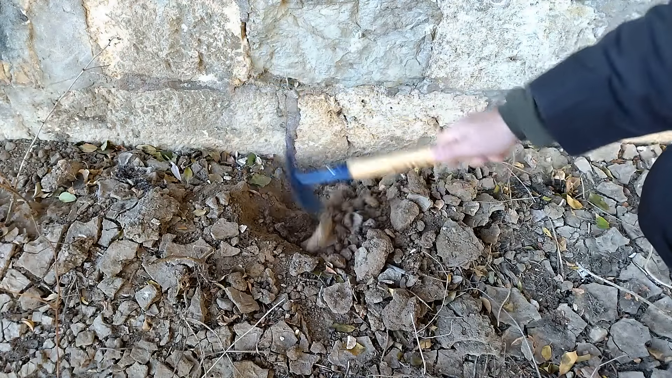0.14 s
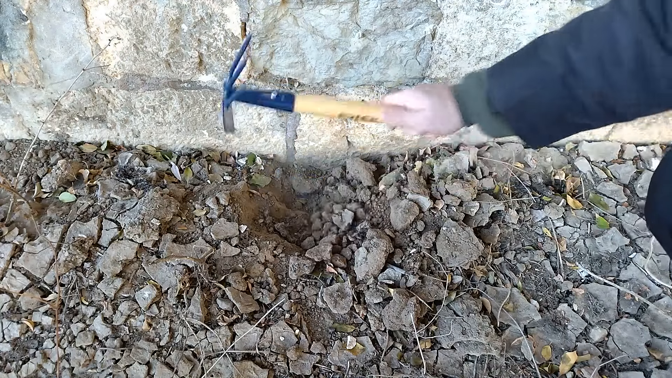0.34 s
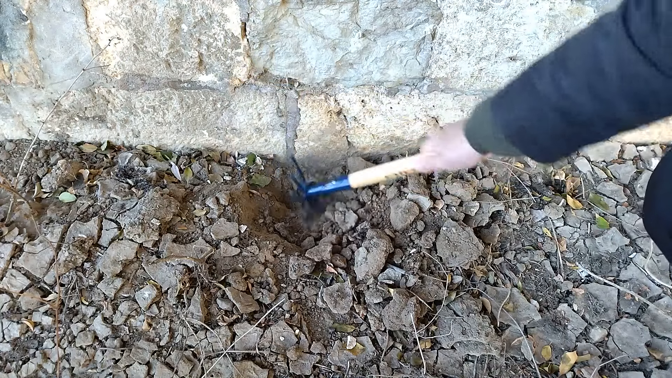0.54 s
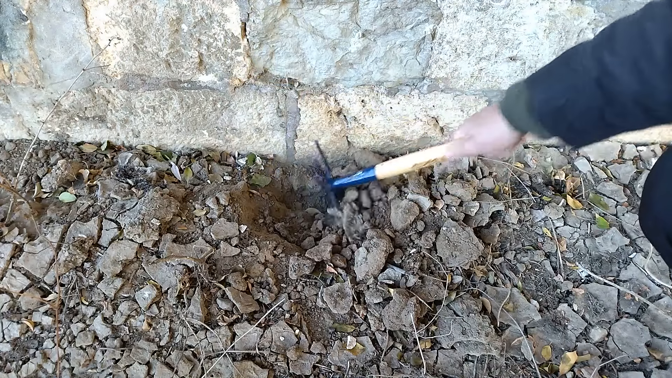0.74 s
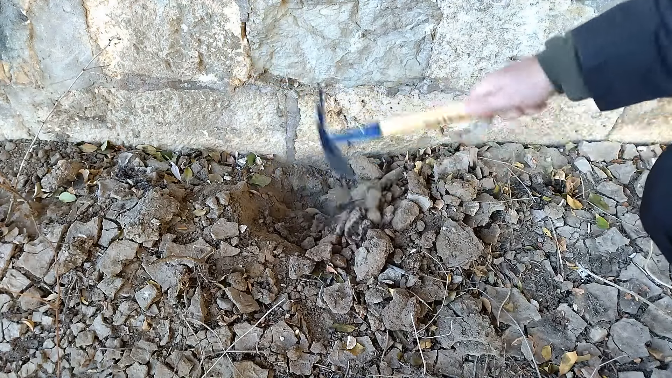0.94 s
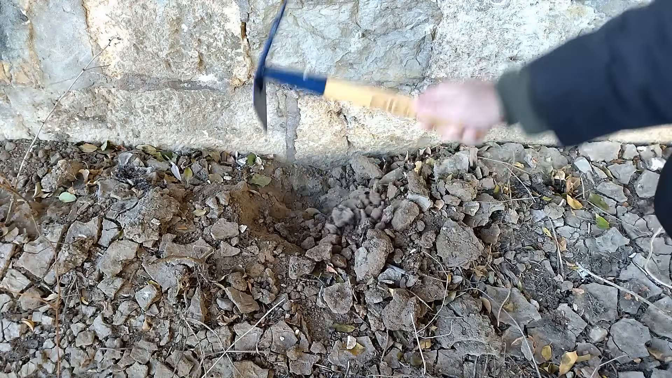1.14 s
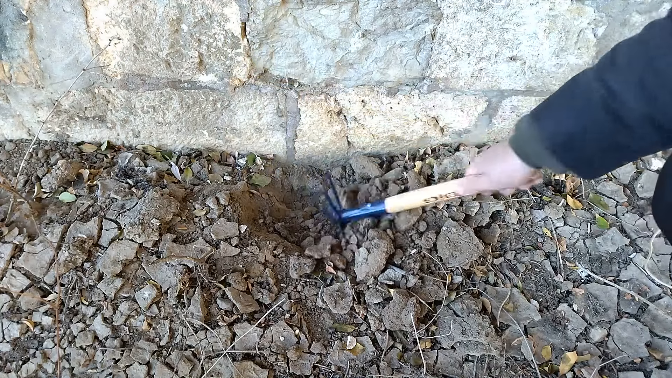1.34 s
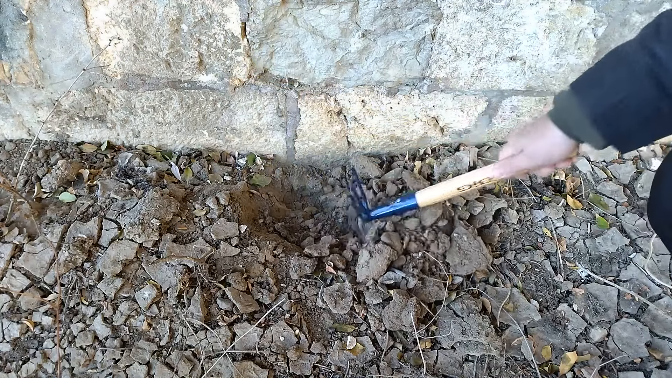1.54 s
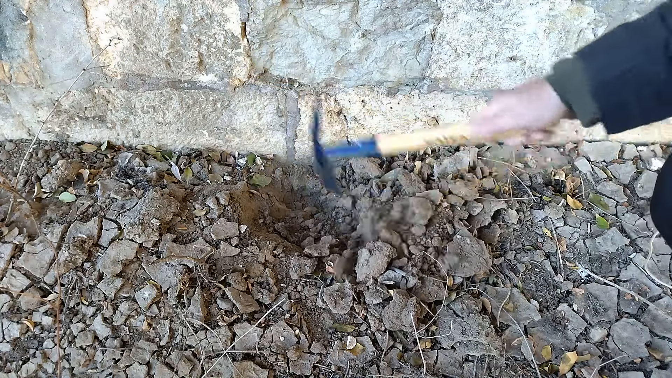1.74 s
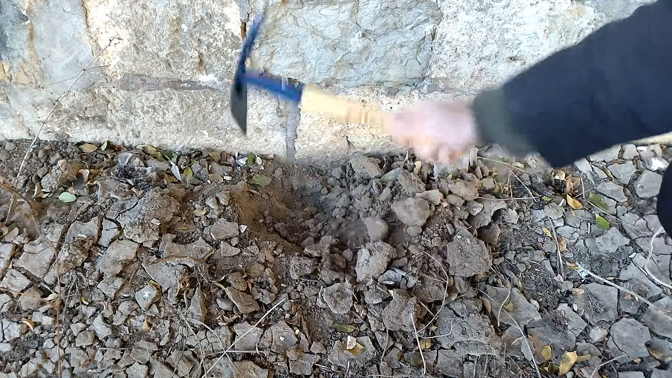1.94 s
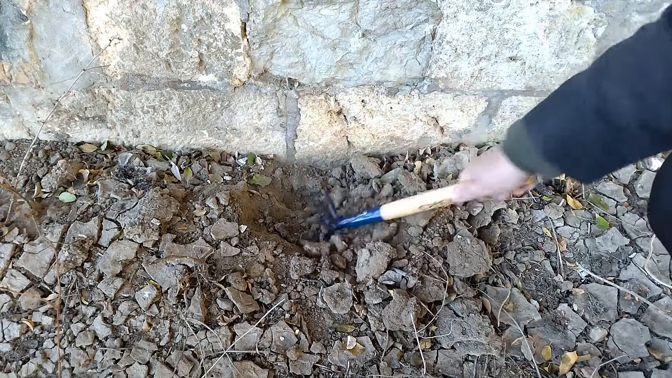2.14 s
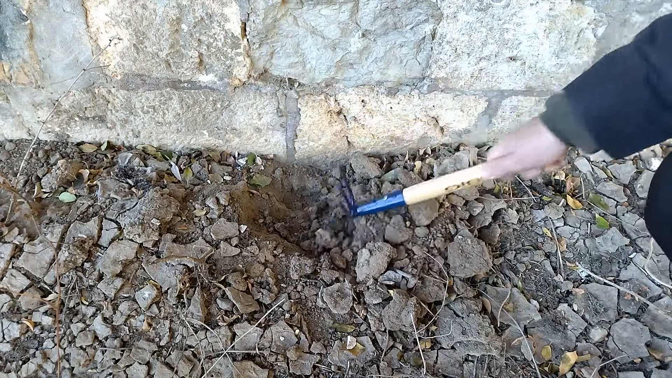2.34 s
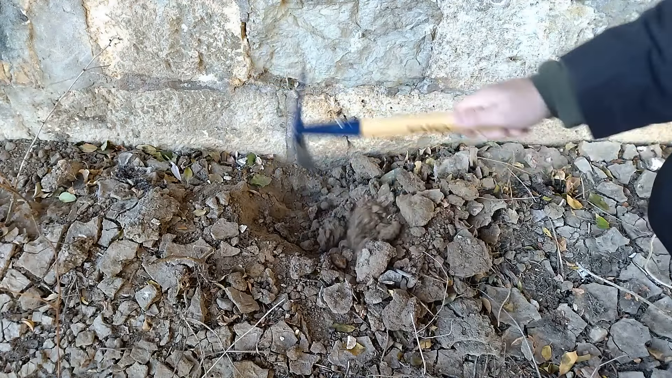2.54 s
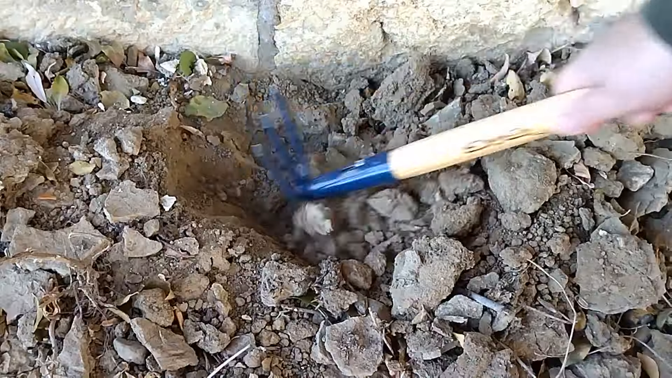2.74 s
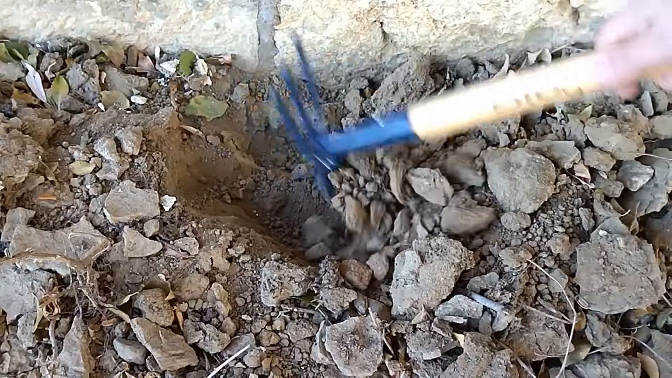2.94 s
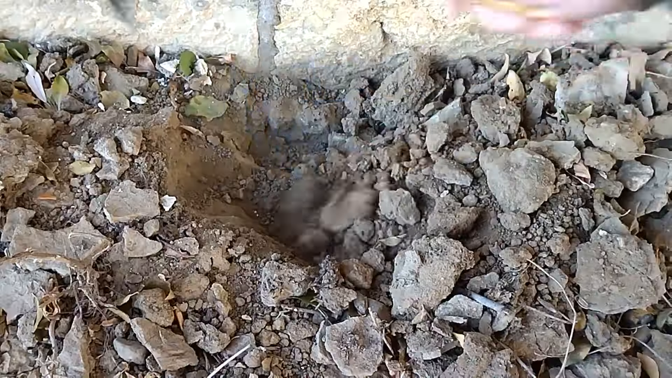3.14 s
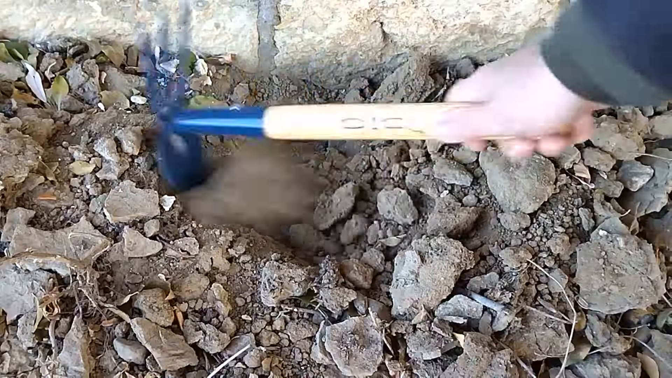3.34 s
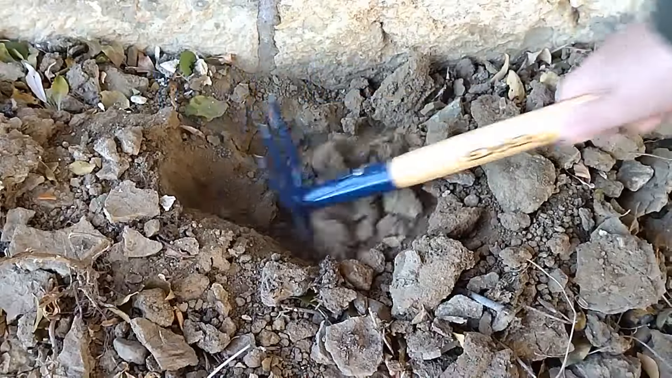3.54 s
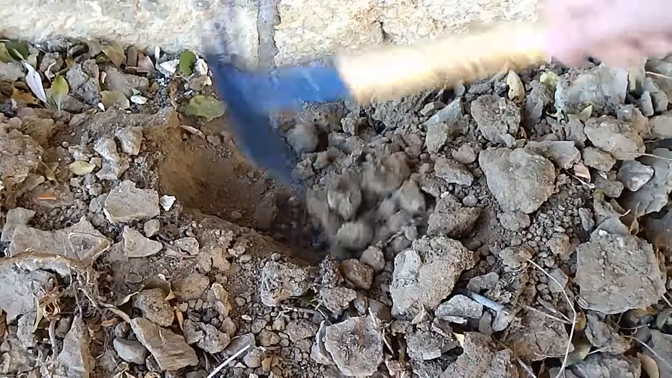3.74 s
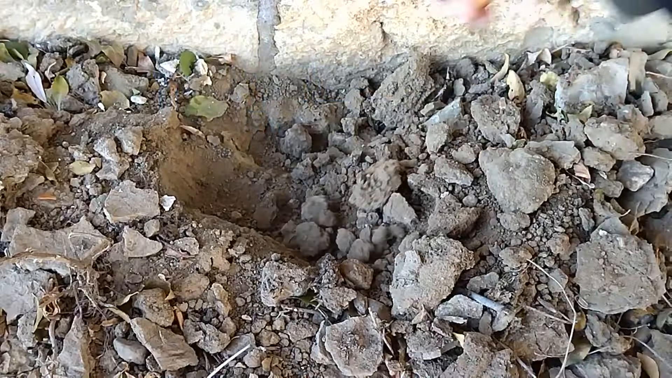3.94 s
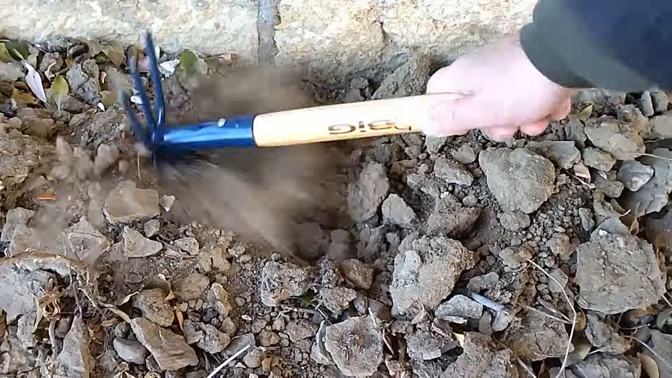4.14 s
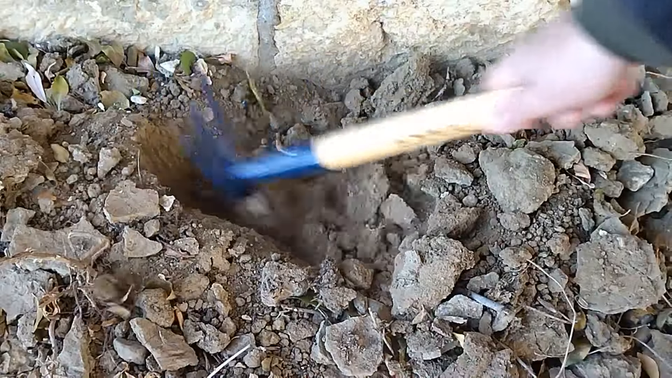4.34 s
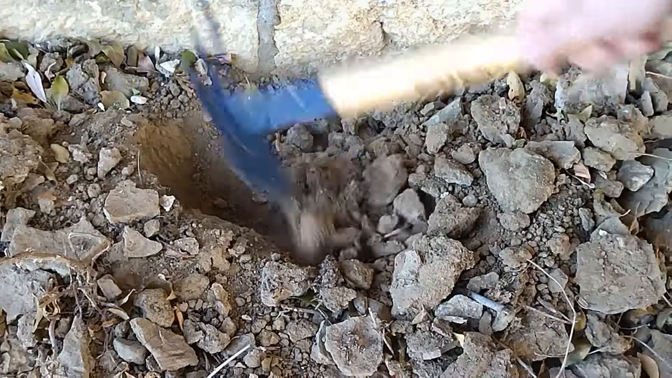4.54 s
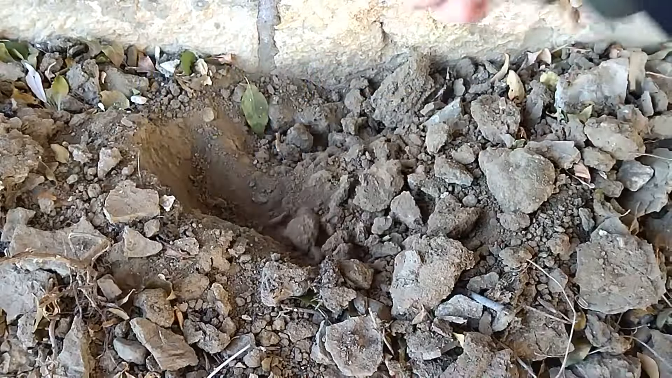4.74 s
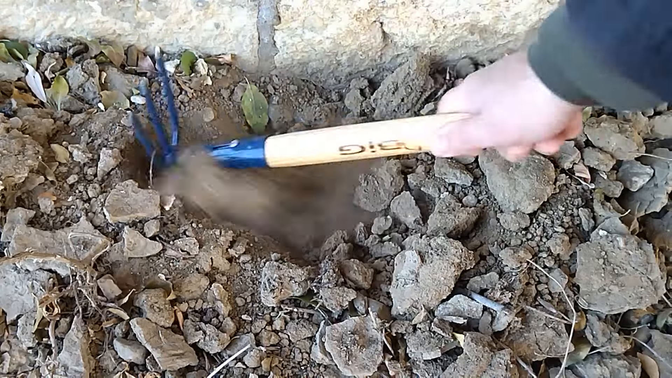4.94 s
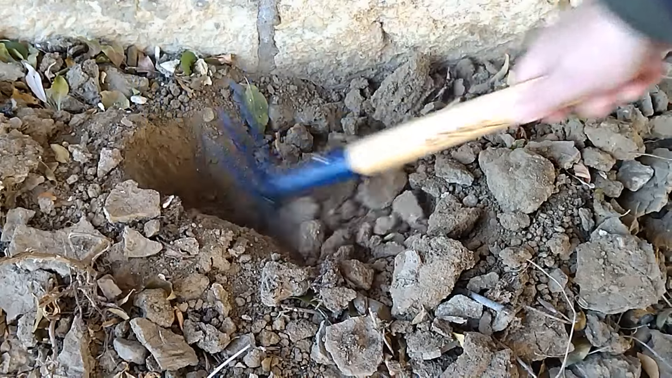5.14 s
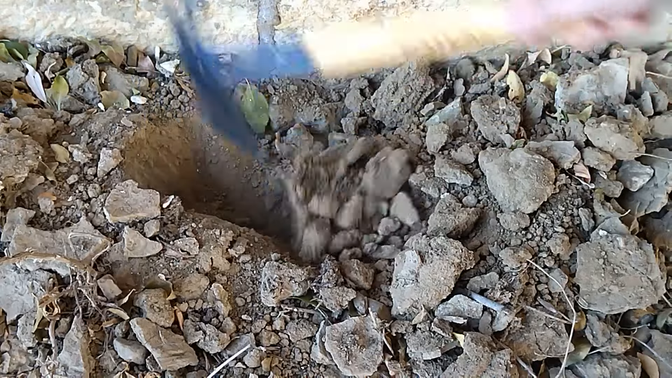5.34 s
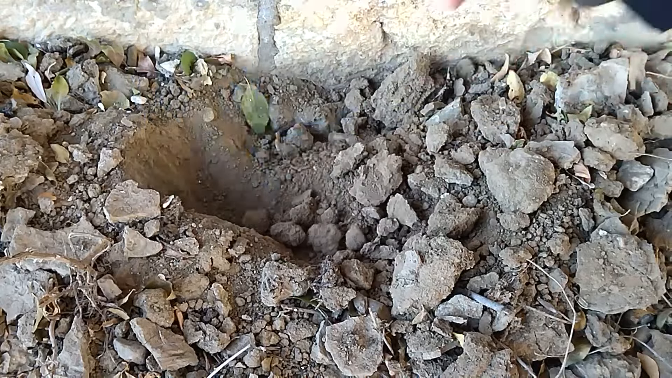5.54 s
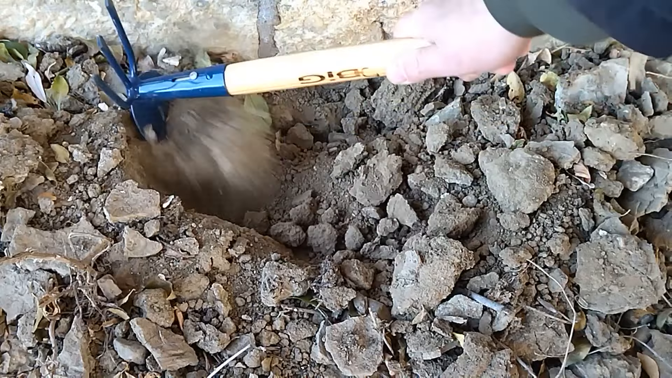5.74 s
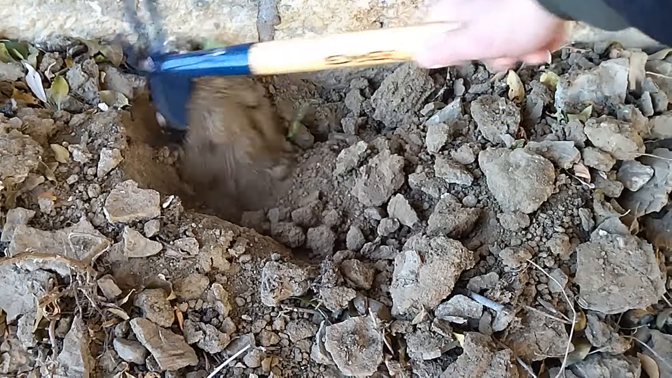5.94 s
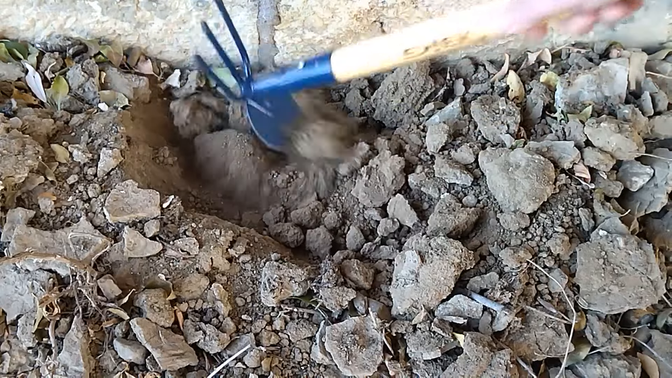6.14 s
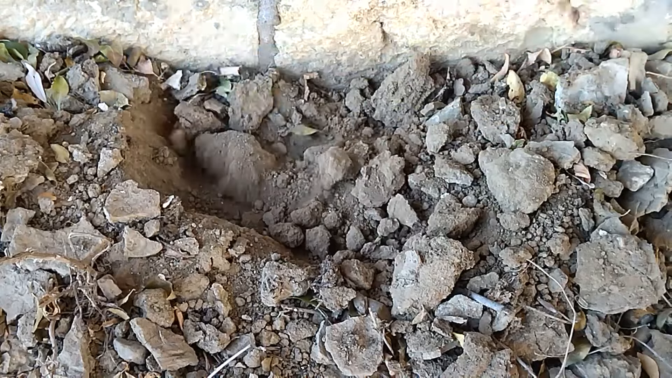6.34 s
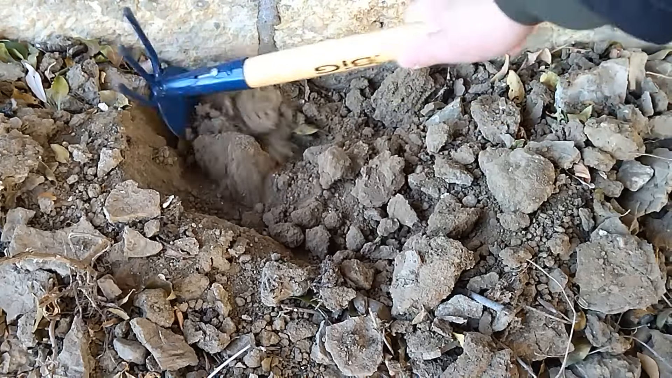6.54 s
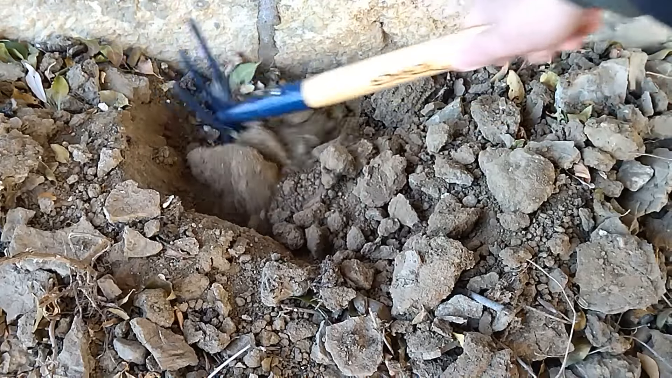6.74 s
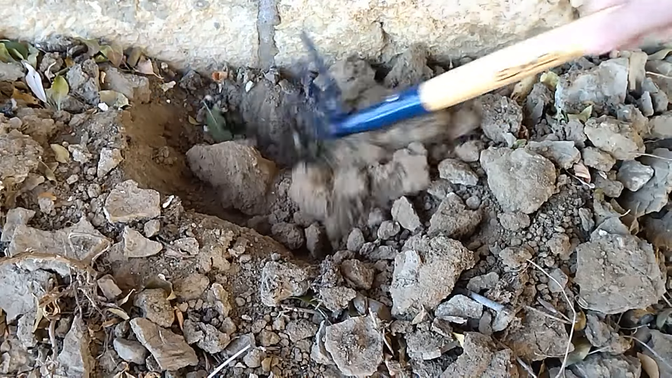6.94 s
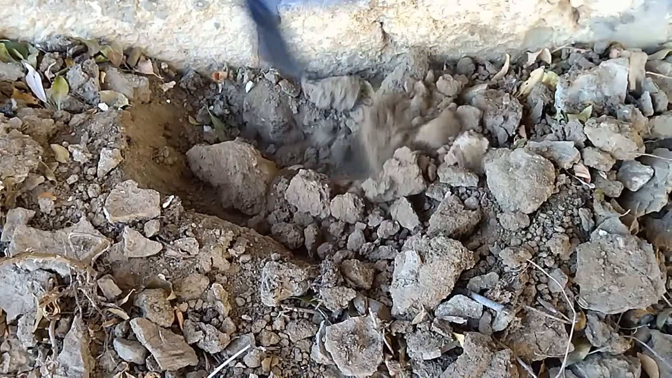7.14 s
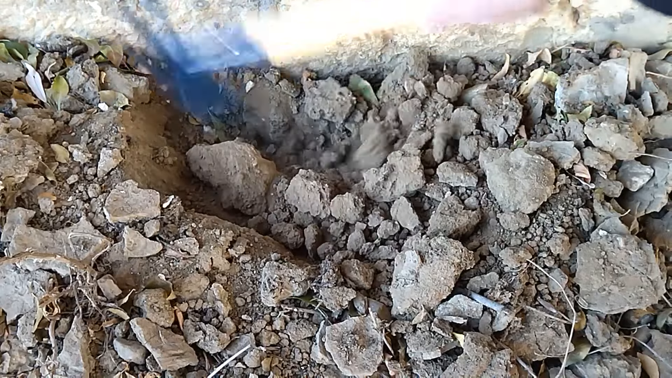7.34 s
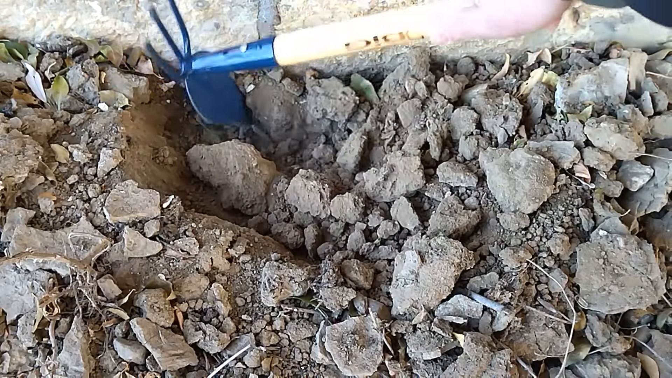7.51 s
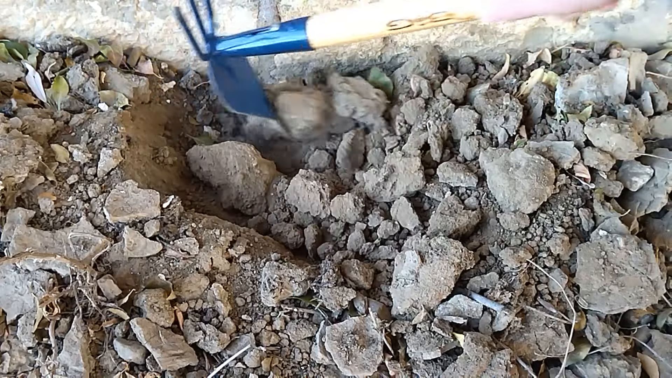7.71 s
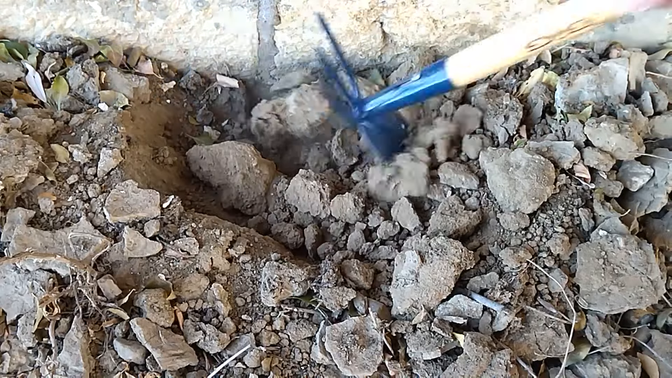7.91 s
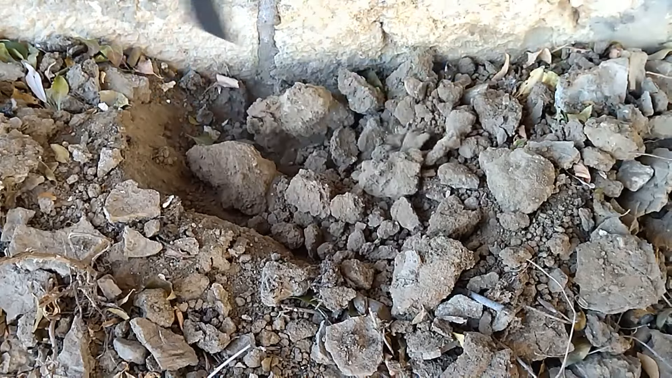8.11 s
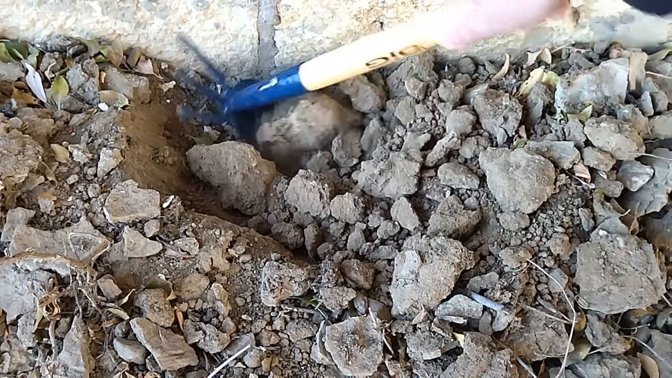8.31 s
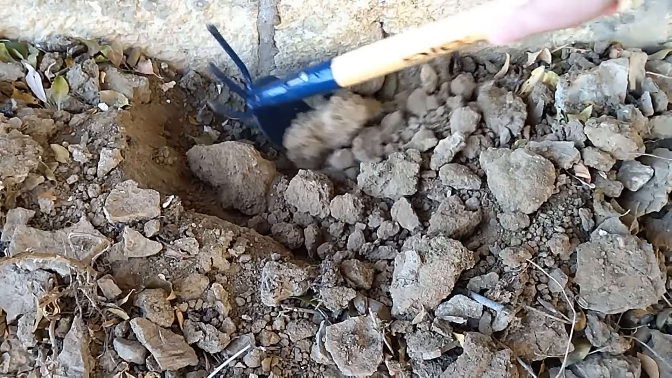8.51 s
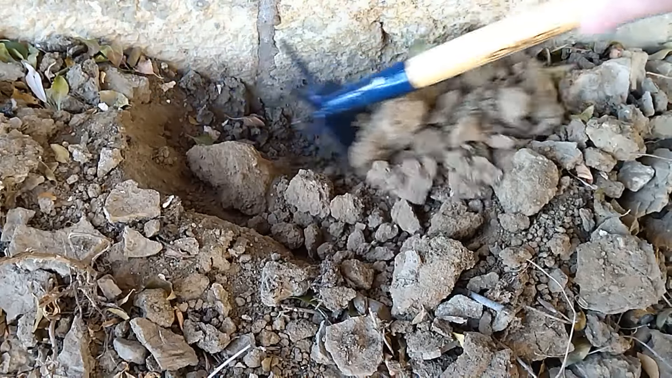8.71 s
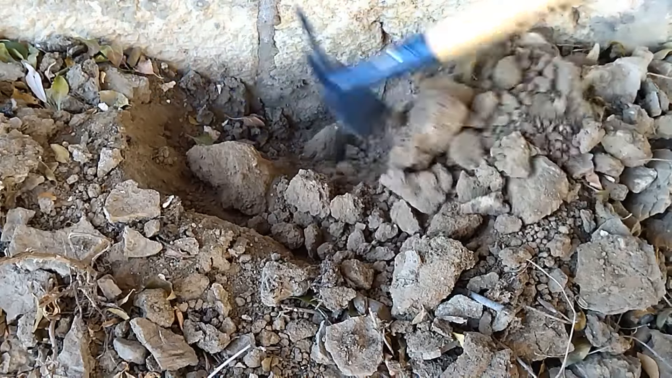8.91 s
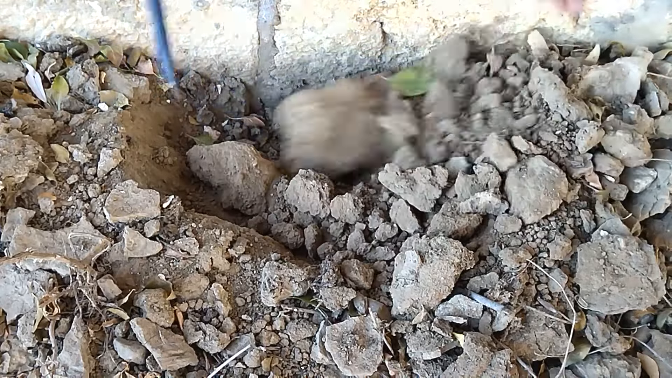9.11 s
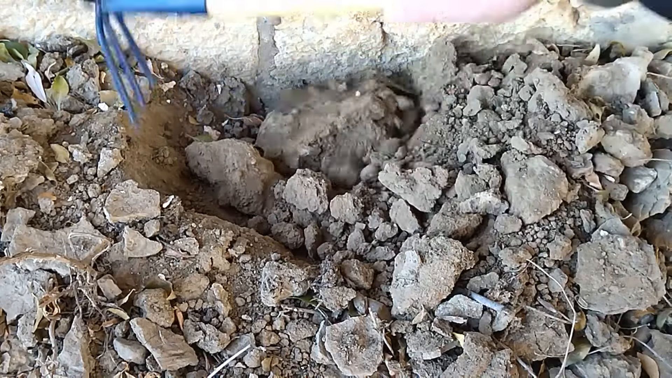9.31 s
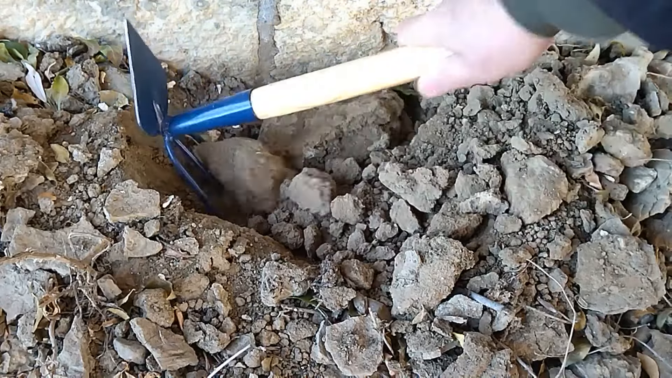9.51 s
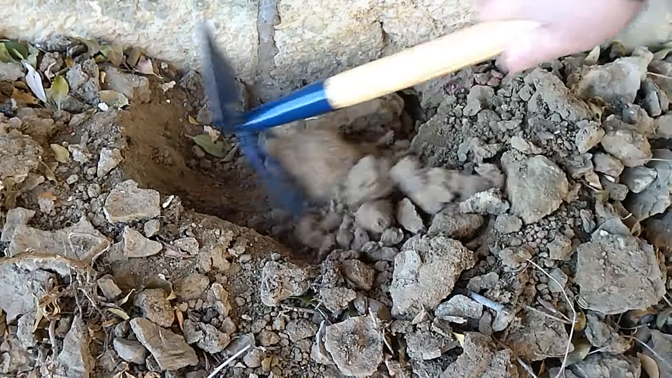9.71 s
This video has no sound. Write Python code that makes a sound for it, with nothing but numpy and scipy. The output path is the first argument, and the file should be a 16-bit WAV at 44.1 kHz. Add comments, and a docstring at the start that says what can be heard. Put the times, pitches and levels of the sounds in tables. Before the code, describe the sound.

Close, crunchy digging in gravelly earth: sharp gritty strikes with dull thuds, scraping pulls of soil, clacking stones and faint metallic chinks over quiet open air.

```python
"""A small steel pick is swung into dry stony soil by a wall, close to a two-port microphone.
Each blow is crackling grit that rings the blade, then a knock and a low thud.
Between blows the blade drags soil: rains of random clicks, filtered into sand, pebbles, gravel and clods.
Stones clack, tines chink and pebbles tick now and then, as short dying notes or bursts of noise.
Behind it all are the wash of open air, a far rumble and an airy hiss, made of filtered noise."""
import sys
import numpy as np
from scipy import signal
from scipy.fft import rfft, irfft, next_fast_len
from scipy.io import wavfile
from scipy.ndimage import uniform_filter1d, minimum_filter1d

SR = 44100
rng = np.random.default_rng(int(sys.argv[2]) if len(sys.argv) > 2 else 0)


def output_pcm(signal):
    """Save a mono or channel-first signal as 16-bit PCM at the path in sys.argv[1].

    Samples are clipped to [-1, 1] before scaling.
    """
    pcm = np.clip(np.atleast_2d(signal).T, -1, 1) * 32767
    wavfile.write(sys.argv[1], SR, np.round(pcm).astype(np.int16))


N = 435266  # length in samples


def gain_of(db):
    """Turns decibels into a gain."""
    return 10 ** (np.asarray(db) / 20)


def evened(x):
    """Scales to rms 1."""
    return x / np.sqrt(np.mean(x ** 2) + 1e-20)


def peaked(x):
    """Scales to peak 1."""
    return x / (abs(x).max() + 1e-20)


def levelled(x):
    """Scales so that the loudest 8 ms have rms 1."""
    return x / np.sqrt(uniform_filter1d(x ** 2, 350).max() + 1e-20)


def read(points, hz):
    """Reads a table between its points, along a log-frequency axis."""
    f, value = np.transpose(points)
    return np.interp(np.log(hz + 1), np.log(f + 1), value)


def add(mix, s, sound):
    """Mixes a sound in at s seconds."""
    part = mix[max(round(s * SR), 0):][:len(sound)]
    part += sound[:len(part)]


def colour(x, points):
    """Filters a sound by a table of levels over frequency."""
    length = x.shape[-1]
    size = next_fast_len(length)
    gain = gain_of(read(points, np.fft.rfftfreq(size, 1 / SR)))
    return irfft(rfft(x, size) * gain, size)[..., :length]


def crackle(size, per_s, spread_db):
    """Clicks at random moments and of random size, as grains knock; a wide spread gives a few large ones."""
    big_db = spread_db * np.minimum(rng.exponential(1, size), 4)
    hits = rng.random(size) < per_s / SR
    return evened(gain_of(big_db) * rng.standard_normal(size) * hits)


def ring(hz, db, t60, t):
    """One mode (a single dying note), which falls by 60 dB in t60 seconds."""
    return gain_of(db - 60 * t / t60) * np.sin(2 * np.pi * hz * t)


def wander(seconds):
    """Slow random drift of rms 1."""
    width = round(seconds * SR)
    return evened(uniform_filter1d(uniform_filter1d(rng.standard_normal(N), width), width))


# colour of the open air: f/Hz, relative level/dB
AIR_COLOUR = [(40, -42), (80, 1), (270, -1), (1100, -0.5), (1700, -5.5), (3500, -11), (6000, -16),
              (16000, -21.5)]
# how alike the air sounds at both ports: f/Hz, left-right likeness (1 = the same)
AIR_LIKENESS = [(50, 1), (300, 0.19), (1500, 0.057), (6000, 0.2)]


def air(rms_db=-60.5, patch_db=2.9):
    """The wash of open air: noise in every frequency band, swelling and sinking in drifting patches."""
    frames, hz = N // 256 + 5, np.fft.rfftfreq(1024, 1 / SR)
    a, b, c, d, patches = rng.standard_normal((frames, 513, 5)).T
    patches = evened(uniform_filter1d(uniform_filter1d(patches, 10, 0), 20, 1))
    likeness = np.clip(read(AIR_LIKENESS, hz), -1, 1)[:, None]
    left = a + 1j * b
    right = likeness * left + np.sqrt(1 - likeness ** 2) * (c + 1j * d)
    bands = np.array([left, right])
    bands *= gain_of(read(AIR_COLOUR, hz)[:, None] + patch_db * patches)
    wash = signal.istft(bands, nperseg=1024, noverlap=768)[1][:, :N]
    return gain_of(rms_db) * evened(wash)


def distant(curve, spectrum, spread):
    """A far, smooth noise, partly alike at both ports; more spread makes them less alike."""
    s, db = np.transpose(curve)
    both, apart = rng.standard_normal(N), rng.standard_normal((2, N))
    level = gain_of(np.interp(np.arange(N) / SR, s, db))
    return level * evened(colour(both + spread * apart, spectrum))


# far low rumble over time: t/s, level/dB
RUMBLE_LEVEL = [(0.0, -58), (0.16, -64), (0.4, -64), (1.9, -70.5), (2.4, -78), (2.8, -61), (3.2, -69.5),
                (4.2, -71), (5.1, -83), (6.5, -80), (6.78, -68), (7.1, -89), (7.6, -70), (8.0, -68),
                (8.27, -62.5), (8.8, -70), (9.2, -66.5), (9.6, -61), (9.87, -69)]
# colour of the rumble: f/Hz, relative level/dB
RUMBLE_COLOUR = [(25, -11), (60, -3.5), (100, 3), (140, -3.5), (400, -38)]
# distant airy hiss over time: t/s, level/dB
HISS_LEVEL = [(0, -66), (2.62, -76), (2.66, -61.5), (3.3, -59.5), (4.1, -60.5), (4.9, -62), (5.7, -67.5),
              (6.4, -70), (9.87, -77)]
# colour of the hiss: f/Hz, relative level/dB
HISS_COLOUR = [(600, -25), (1200, -6), (1600, 1.5), (2100, -7.5), (3200, -27)]


def rumble_and_hiss():
    """Low noise and airy noise from afar, each rising and falling by its own table."""
    low = distant(RUMBLE_LEVEL, RUMBLE_COLOUR, spread=0.37)
    return low + distant(HISS_LEVEL, HISS_COLOUR, spread=1.0)


# small pebbles ticking: t/s, peak level/dB
TICK_EVENTS = [(0.083, -44), (0.6464, -37), (0.7158, -35), (0.8435, -42), (0.867, -38), (0.925, -42),
               (2.414, -42), (2.6416, -40), (2.6633, -37), (3.3134, -42), (3.555, -34), (3.7514, -38.5),
               (4.3231, -46), (4.4747, -30), (4.635, -40), (5.446, -49), (6.0786, -40), (6.84, -30),
               (7.86, -32), (7.91, -27), (8.77, -32), (8.8494, -29.5), (9.7896, -51), (9.8354, -39)]
# colour of grit, in the ticks and in the blows: f/Hz, relative level/dB
GRIT_COLOUR = [(800, -63.5), (2500, -16), (3500, -11), (5000, 0), (9000, 1), (12500, 0.5), (16000, -0.5)]


def tick(db):
    """A short spit of grit: a very fast dying burst of noise."""
    t = np.arange(0, .03, 1 / SR)
    burst = rng.standard_normal(len(t)) * gain_of(-4000 * t)
    return gain_of(db) * peaked(colour(burst, GRIT_COLOUR))


# tines touched by a stone: t/s, peak level/dB, lowest mode f/Hz, its t60/s,
# upper mode f/Hz, upper mode level/dB against the lowest mode
CHINK_EVENTS = [(0.1454, -47, 2450, 0.089, 4490, 1), (0.8684, -40.5, 1545, 0.023, 4240, 10),
                (1.7, -53.5, 2620, 0.14, 4180, -6), (2.469, -44.5, 2610, 0.12, 4860, -16),
                (3.0015, -43, 2350, 0.055, 4860, 10), (5.1856, -38, 2900, 0.12, 4900, -3),
                (6.8404, -55, 1600, 0.09, 5310, -5), (7.8634, -44.5, 2440, 0.094, 4520, 13),
                (8.9675, -50, 1680, 0.083, 4090, 7)]


def chink(db, hz, t60, upper_hz, upper_db):
    """A tine rings in two close pairs of modes, with a soft start."""
    t = np.arange(0, .25, 1 / SR)
    low = ring(hz, 0, t60, t) + ring(hz * 1.01, -14, 2.45 * t60, t)
    high = ring(upper_hz, upper_db, .6 * t60, t) + ring(upper_hz * .94, upper_db - 3, .4 * t60, t)
    soft_start = 1 - np.exp(-t / 0.0036)
    return gain_of(db) * peaked((low + high) * soft_start)


# stones and clods knocking: t/s, peak level/dB, lowest mode f/Hz
CLOD_EVENTS = [(0.639, -45, 225), (0.955, -41.5, 188), (1.942, -49.5, 363), (2.642, -44, 362),
               (3.423, -29.5, 159), (3.473, -37.5, 243), (3.553, -31.5, 258), (4.37, -44, 269),
               (4.4, -36, 960), (5.095, -53, 226), (6.75, -37, 150), (6.863, -37, 277), (6.897, -38, 317),
               (6.79, -39, 250), (6.82, -36.5, 300), (6.96, -40, 246), (6.992, -50, 199),
               (7.449, -32.5, 195), (7.979, -38, 1060), (8.252, -55, 410), (8.322, -44, 420),
               (8.394, -30.5, 597), (8.772, -42, 248), (9.212, -42, 407), (9.243, -43, 300),
               (9.495, -40, 243), (9.367, -57, 635), (9.609, -45, 159)]


def clod(db, hz, t60=0.051):
    """A dull knock: a short crumble of grains rings a heavily damped body."""
    t = np.arange(0, .06, 1 / SR)
    body = ring(hz, 0, t60, t)
    body += ring(hz * 1.2, 4.0, 0.28 * t60, t)
    body += ring(hz * 3.4, -31, 0.19 * t60, t)
    crumble = rng.standard_normal(300) * gain_of(-7000 * t[:300])
    return gain_of(db) * peaked(signal.fftconvolve(crumble, body))


# the blade pulls soil out or lets it slide: start t/s, length t/s,
# sand level/dB, gravel level/dB, clods level/dB, swell over its length level/dB
PULL_EVENTS = [(0.083, 0.064, -64.5, -63, -68, 3), (0.617, 0.3, -59, -57.5, -64.5, -9),
               (1.227, 0.012, -70, -68.5, -76, -12), (1.415, 0.32, -58, -66.5, -67, -4.5),
               (1.807, 0.21, -60.5, -67.5, -82, 4), (2.226, .12, -67.5, -66.5, -63, -3),
               (2.407, 0.058, -66, -69, -87, 5), (2.656, 0.37, -55, -55.5, -60.5, -11),
               (3.443, 0.11, -47, -49.5, -53.5, 5.5), (4.242, 0.1, -51.5, -54, -62.5, 11.5),
               (4.357, .13, -48.5, -51, -58.5, -2), (4.994, 0.15, -50.5, -52, -52.5, 3.5),
               (5.22, 0.12, -59, -78, -67, -12), (5.823, 0.18, -58, -69.5, -82, 8),
               (6.047, 0.13, -50.5, -60, -63, 4.5), (6.655, 0.1, -52.5, -55.5, -60, 1),
               (6.752, 0.14, -51.5, -54.5, -45, -3.5), (6.92, 0.11, -55, -56, -50, -2),
               (7.09, 0.052, -60.5, -66, -79, 7), (7.618, 0.21, -65.5, -80, -79, 16),
               (7.855, 0.099, -49.5, -54.5, -60.5, 5.5), (8.253, 0.045, -69, -68, -62.5, -1),
               (8.384, 0.05, -71, -53, -49, -1), (8.512, .3, -59, -65, -63, 13.5),
               (8.82, 0.15, -53.5, -63.5, -67, 4), (8.984, 0.34, -61.5, -68.5, -65.5, -0.5),
               (9.6, 0.052, -67, -65, -63.5, 2), (9.702, 0.18, -59, -63.5, -61.5, 13)]
# the heap never rests: sand level/dB, gravel level/dB, clods level/dB
SETTLE_LEVELS = (-69, -74, -69)
# the struck face caves in, level/dB against the blow: sand under the grit, gravel under the knock,
# clods under the thud
CRUMBLE_LEVELS = (-25.5, -13, -9)
RISE_DB_PER_S, STOP_DB_PER_S = 900, 179.5  # how fast a pull sets in and dies
TRICKLE_DB, TRICKLE_DB_PER_S = -28, 64  # loose soil keeps running after a pull: start level, fall
CRUMBLE_S, CRUMBLE_DB_PER_S = .012, 207.5  # the cave-in: delay after the blow, fall


def moving():
    """How much sand, gravel and clods move: the powers of pulls, cave-ins and settling add up; returns gains."""
    t = np.arange(0, N, 64) / SR
    power = gain_of(SETTLE_LEVELS)[:, None] ** 2 * np.ones(len(t))
    for start, length, *levels_db, swell_db in PULL_EVENTS:
        progress = np.clip((t - start) / length, 0, 1)
        before, after = np.maximum(start - t, 0), np.maximum(t - start - length, 0)
        held_db = swell_db * (progress - .5) - RISE_DB_PER_S * before
        tail = gain_of(-STOP_DB_PER_S * after) + gain_of(TRICKLE_DB - TRICKLE_DB_PER_S * after)
        power += (gain_of(levels_db)[:, None] * gain_of(held_db) * tail) ** 2
    for s, *blow_db, _, _ in BLOW_EVENTS:
        u = t - s - CRUMBLE_S
        cave_in = (u > 0) * gain_of(-CRUMBLE_DB_PER_S * abs(u))
        power += (gain_of(np.add(blow_db, CRUMBLE_LEVELS))[:, None] * cave_in) ** 2
    return [np.interp(np.arange(N) / SR, t, np.sqrt(p)) for p in power]


def pebbles(count=28):
    """Stones of many sizes click their own short notes and ring the blade that drags through them."""
    t, notes = np.arange(0, .08, 1 / SR), np.zeros(N)
    for hz in np.geomspace(1200, 15500, count) * rng.uniform(0.91, 1.04, count):
        notes += signal.oaconvolve(crackle(N, per_s=90, spread_db=0.5), ring(hz, 0, 0.032, t))[:N]
    blade = sum(ring(hz, db, t60, t) for hz, db, t60 in BLADE_MODES)
    rung = signal.oaconvolve(crackle(N, per_s=2500, spread_db=-1.0), blade)[:N]
    return evened(notes) + 1.07 * evened(rung)


def patchy(x, depth_db):
    """The colour drifts in random patches of time and frequency, as different stones move."""
    z = signal.stft(x, nperseg=512, noverlap=384)[2]
    field = rng.standard_normal(z.shape)
    field = evened(uniform_filter1d(uniform_filter1d(field, 5, 0), 24, 1))
    return evened(signal.istft(z * gain_of(depth_db * field), nperseg=512, noverlap=384)[1][:N])


# colours of the moving soil, from fine to coarse, each: f/Hz, relative level/dB
SAND_COLOUR = [(2500, -45), (6300, -3.5), (9000, -0.5), (16000, -0.5)]
RATTLE_COLOUR = [(1500, -42), (3400, -4), (4800, -9), (5800, 4.5), (10000, -48)]
GRAVEL_COLOUR = [(250, -36.5), (700, 4), (1700, 5.5), (2700, 3.5), (4200, -6.5), (9000, -51.5)]
ROLL_COLOUR = [(40, -38.5), (130, -3.5), (280, 2), (600, -6), (1000, -14.5), (3000, -62)]


def drag(sand_share=0.57):
    """Four sizes of soil move together, each a rain of grains; all but the clods also carry pebble notes."""
    fine, middle, coarse = moving()
    # rattling pebbles lie between sand and gravel, and come and go
    loose = fine ** sand_share * middle ** (1 - sand_share) * gain_of(-6 + 3 * wander(seconds=0.017))
    clumps_db = 0.94 * evened(uniform_filter1d(rng.standard_normal(N), 700))  # grains come in bunches
    stones = pebbles()
    roll = colour(crackle(N, per_s=900, spread_db=2.0), ROLL_COLOUR)
    gravel = evened(colour(crackle(N, per_s=2500, spread_db=1.5), GRAVEL_COLOUR))
    gravel += 0.48 * evened(colour(stones, GRAVEL_COLOUR))
    rattle = evened(colour(crackle(N, per_s=4300, spread_db=6.5), RATTLE_COLOUR))
    rattle += 1.1 * evened(colour(stones, RATTLE_COLOUR))
    sand = evened(colour(crackle(N, per_s=11000, spread_db=4.0), SAND_COLOUR))
    sand += 0.25 * evened(colour(stones, SAND_COLOUR))
    mix = coarse * patchy(roll, depth_db=2.4) + middle * patchy(gravel, depth_db=3.5)
    mix += loose * patchy(rattle, depth_db=2.5) + fine * patchy(sand, depth_db=2.5)
    return gain_of(clumps_db) * mix


# blows of the pick: t/s, grit level/dB, knock level/dB, thud level/dB,
# plunge length t/s, delay of the knock and thud t/s
BLOW_EVENTS = [(0.491, -28.5, -31.5, -30.5, 0.02, 0.00032), (0.9073, -54, -72, -64, .003, .0005),
               (1.283, -24, -30.5, -32.5, 0.0043, 0.0027), (2.0753, -14, -24, -32.5, 0.0042, 0.009),
               (3.4046, -36.5, -36, -37, 0.0058, 0.0014), (3.53, -33.5, -38, -71, 0.0051, 0.0004),
               (4.156, -26.5, -30.5, -39.5, 0.0087, 0.00068), (4.434, -39, -40.5, -44, 0.0036, 0.00064),
               (4.934, -49, -41, -43.5, 0.0085, 0.00054), (4.942, -26, -36.5, -34, 0.015, 0.016),
               (5.183, -34.5, -40, -37.5, 0.0022, 0.001), (5.72, -19.5, -41, -40, 0.014, 0.0054),
               (6.570, -25.5, -32, -34, 0.012, 0.0064), (6.9003, -57, -51, -54, .004, 0.00044),
               (7.433, -36, -40.5, -39.5, 0.0064, 0.0044), (8.3433, -23, -23.5, -40, 0.0017, 0.00021),
               (8.442, -42, -41, -50, 0.014, 0.008), (9.468, -42, -53, -45.5, 0.034, 0.0088)]
# modes of the blade, in the blows and the drag: f/Hz, relative level/dB, t60/s
BLADE_MODES = [(950, 13, 0.013), (1894, 1.5, 0.005), (2490, -14, 0.13), (2900, -3, 0.097),
               (4000, -15.5, 0.035), (4380, 4.5, 0.078), (4736, 10, 0.027), (5130, 8, 0.019),
               (6540, 3, 0.3), (7390, 7, 0.012), (8460, 15, 0.034), (9600, 5.5, 0.026), (10090, -7, 0.047),
               (11100, -32, 0.013), (13500, -38, .03), (15630, 6, 0.047), (15460, -7, 0.013),
               (15130, -17.5, 0.0248)]
# colours of the knock and the thud, each: f/Hz, relative level/dB
KNOCK_COLOUR = [(200, -45.5), (600, -29), (950, 3.5), (1700, 5.5), (2800, -0.5), (4500, -12), (9000, -66)]
THUD_COLOUR = [(30, -17), (110, 2), (300, 5.5), (550, -2), (1000, -9.5), (3000, -76)]
LEAD_S = .008  # each blow sound begins this long before its landing


def blow(grit_db, knock_db, thud_db, plunge, late):
    """Grit crackles along the plunging blade and rings it; the soil stops it with a knock and a thud."""
    t = np.arange(0, .4, 1 / SR) - LEAD_S  # 0 is the landing
    start = gain_of(-3500 * np.maximum(-t, 0) - 17.5 * (t < 0))  # loose grains are met first
    after = np.maximum(t - plunge, 0)
    bite = 1 + 5.1 * gain_of(-5000 * np.maximum(t, 0))  # the edge lands hardest
    spray = gain_of(-10 - 210 * after)  # thrown grit rains down
    scrape = start * (bite * gain_of(-3500 * after) + spray)
    drive = scrape * crackle(len(t), per_s=18000, spread_db=7.5)

    # each blow meets the blade elsewhere: mode levels and pitches vary at random
    struck_db, detune = rng.standard_normal((2, len(BLADE_MODES)))
    modes = np.array([ring(hz * (1 + 0.012 * e), db + 3 * d, t60, t[:4000] + LEAD_S)
                      for (hz, db, t60), d, e in zip(BLADE_MODES, struck_db, detune)])
    low = np.array(BLADE_MODES)[:, 0] < 3300  # low modes sound with the knock, high ones with the grit
    steel = evened(signal.fftconvolve(drive, modes[~low].sum(0))[:len(t)])
    grit = levelled(evened(colour(drive, GRIT_COLOUR)) + gain_of(-10.0) * steel)

    u = t - late  # 0 is the stop
    fall = np.maximum(u, 0)
    stop = np.where(u < 0, gain_of(-14) * start, gain_of(-2500 * fall) + gain_of(-39.0 - 160 * u))
    jolt = stop * crackle(len(t), per_s=5400, spread_db=4.0)
    clang = evened(signal.fftconvolve(jolt, modes[low].sum(0))[:len(t)])
    knock = levelled(evened(colour(jolt, KNOCK_COLOUR)) + gain_of(-8.5) * clang)

    push = np.where(u < 0, gain_of(-13.5) * start, gain_of(-700 * fall) + gain_of(-42 - 126 * u))
    thud = levelled(colour(push * crackle(len(t), per_s=1900, spread_db=0.0), THUD_COLOUR))
    return gain_of(grit_db) * grit + gain_of(knock_db) * knock + gain_of(thud_db) * thud


def ports(x, right_late_s=7e-5):
    """The hole is nearer the left port, so the sound reaches the right one a little later."""
    size = next_fast_len(N)
    half = np.exp(1j * np.pi * np.fft.rfftfreq(size, 1 / SR) * right_late_s)  # half the delay each way
    return irfft(rfft(x, size) * np.array([half, 1 / half]), size)[:, :N]


# stones scatter mostly the treble: f/Hz, relative level/dB
SCATTER_COLOUR = [(40, -8), (130, -15), (800, 1), (3000, 2), (16000, 4.5)]


def wall(x, count=3):
    """Scattered echoes from wall and stones, different at each port; echo patterns take turns at a steady pace."""
    t, out = np.arange(0, .1, 1 / SR), np.zeros((2, N))
    shape = (count, 2, len(t))
    taps = rng.standard_normal(shape) * (rng.random(shape) < .08) * (t > .0003)
    taps *= gain_of(-2500 * t) + gain_of(-11 - 490 * t)  # near stones, then the wall and yard
    taps /= np.linalg.norm(taps, axis=2, keepdims=True)
    bright = colour(x, SCATTER_COLOUR)
    for k in range(count):
        turn = np.cos(np.pi * (6.3 * np.arange(N) / SR + k / count))
        share = np.sqrt(2 / count) * turn  # squares sum to 1
        out += signal.fftconvolve((share * bright)[None], taps[k], axes=1)[:, :N]
    return out


def scene():
    """All that happens in the hole, its reflections, the air and the far noises."""
    hole = drag()
    for s, *row in BLOW_EVENTS:
        add(hole, s - LEAD_S, blow(*row))
    for rows, source in ((CLOD_EVENTS, clod), (CHINK_EVENTS, chink), (TICK_EVENTS, tick)):
        for s, *row in rows:
            add(hole, s, source(*row))
    return ports(hole) + gain_of(-2.5) * wall(hole) + air() + rumble_and_hiss()


def low_pass(x):
    """Removes everything above the highest recorded frequency."""
    return signal.sosfilt(signal.butter(12, 16980, fs=SR, output="sos"), x)


# colour of the two ports: f/Hz, left level/dB, right level/dB
PORT_COLOURS = [(25, -8, -8), (60, 0, 0), (300, -1, 1), (1000, 0, 0), (2500, -1, 1), (3600, -2, -2),
                (4800, 1, 1), (5900, -8, -8), (7100, 0, -1), (7700, -3, -4), (8400, 5, 0), (9800, 0, 1),
                (10600, -3, 1), (11800, 2, 2), (14100, -4, -5), (15200, 6, 0), (15850, 3, -3),
                (16250, -40, -45)]


def record(dry):
    """Each port colours the sound; the quiet moment just before a sudden loud one is emptied."""
    table = np.array(PORT_COLOURS)
    left = colour(dry[0], table[:, [0, 1]])
    right = colour(dry[1], table[:, [0, 2]])
    heard = np.array([left, right])
    power_db = 10 * np.log10(abs(uniform_filter1d((heard ** 2).mean(0), 88)) + 1e-12)
    ahead = round(0.014 * SR)
    coming_db = -minimum_filter1d(-power_db, ahead, origin=-(ahead // 2))  # loudest moment just ahead
    dip_db = 30.0 * np.clip(coming_db - power_db - 34.5, 0, 8)  # only before jumps over 34.5 dB
    mix = heard / gain_of(uniform_filter1d(dip_db, 60))
    return low_pass(mix)


dry = scene()
out = record(dry)
output_pcm(out)
```